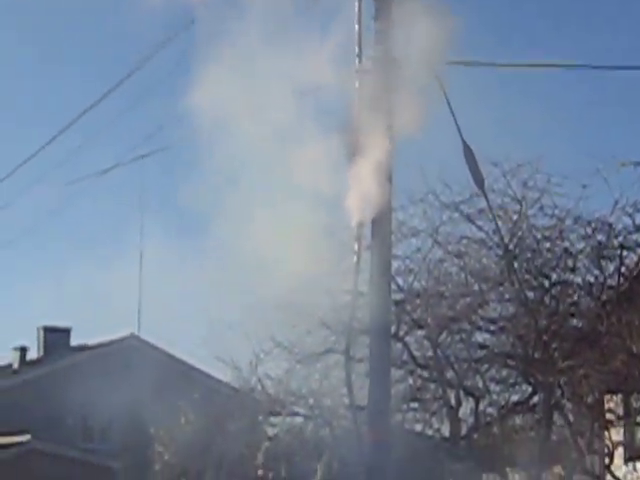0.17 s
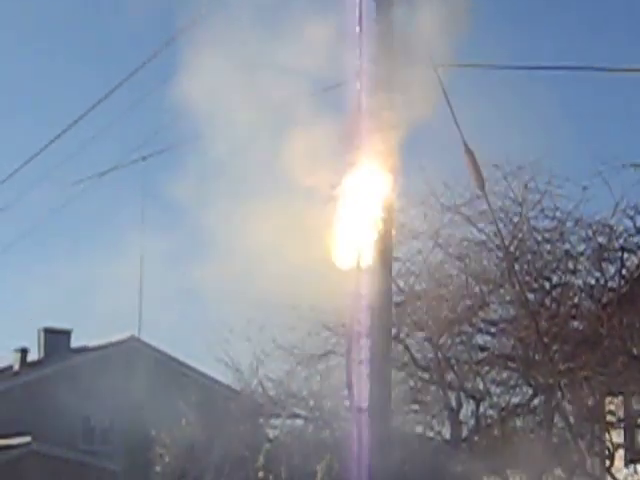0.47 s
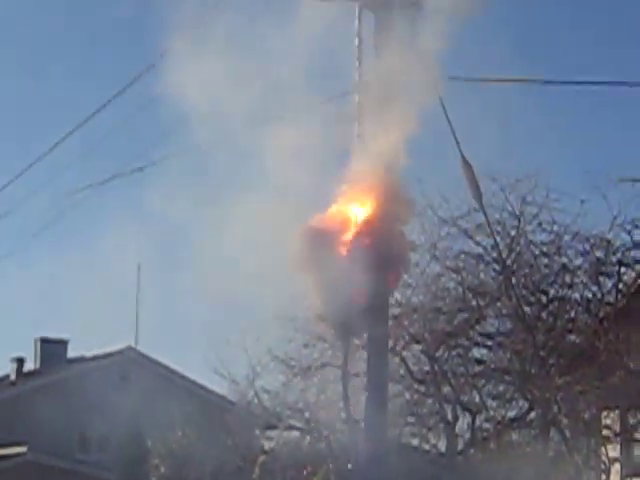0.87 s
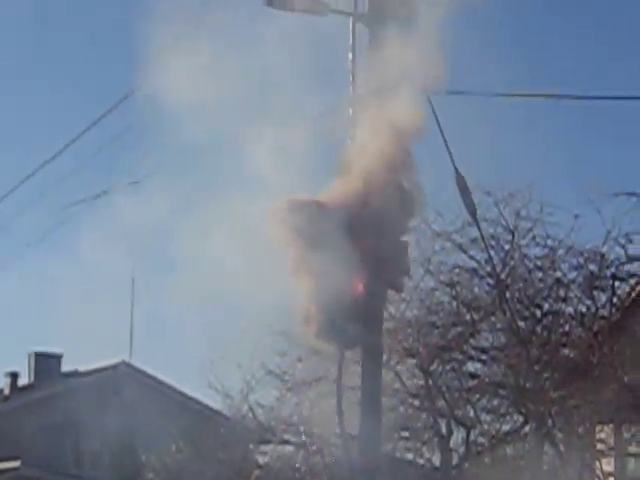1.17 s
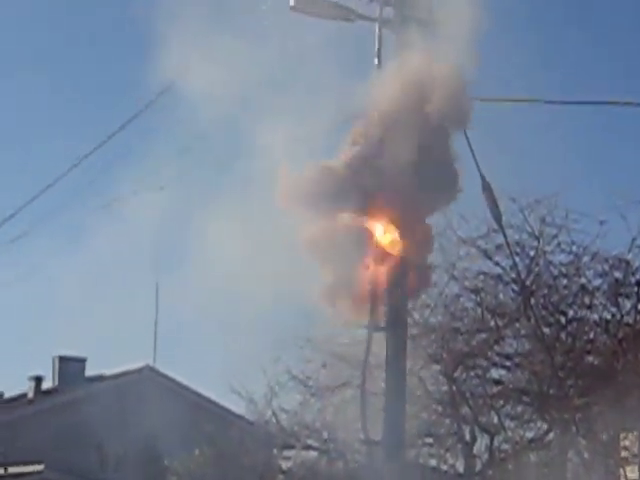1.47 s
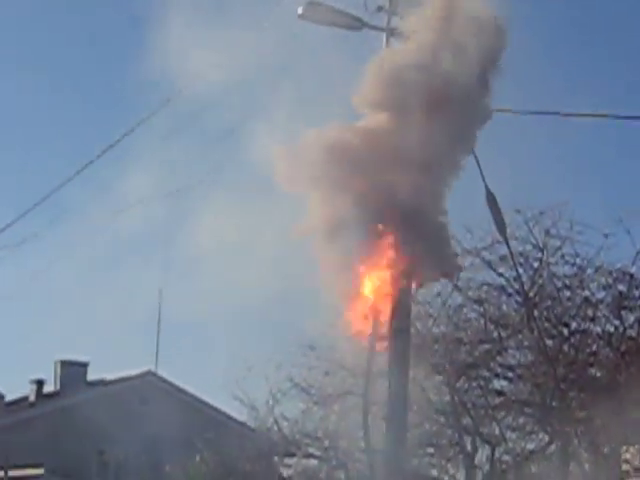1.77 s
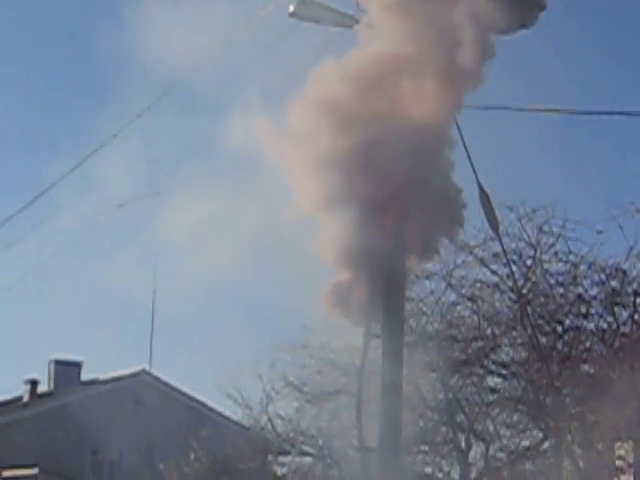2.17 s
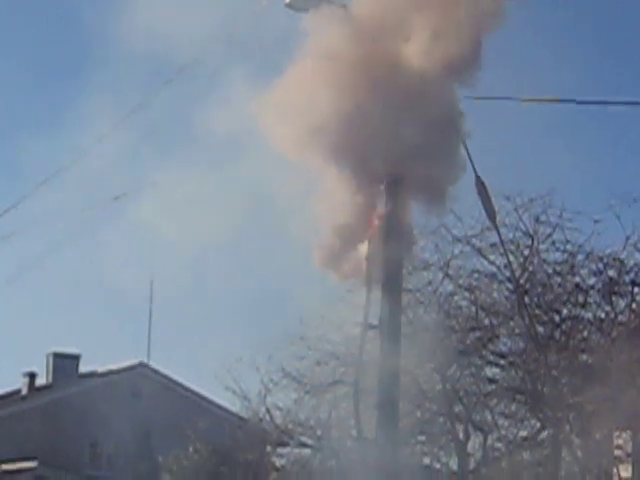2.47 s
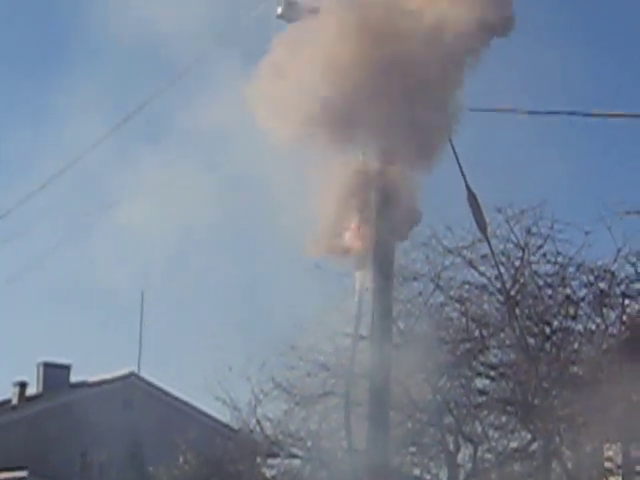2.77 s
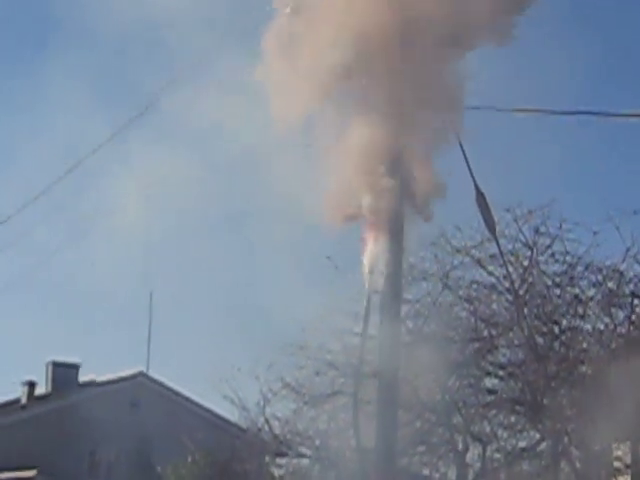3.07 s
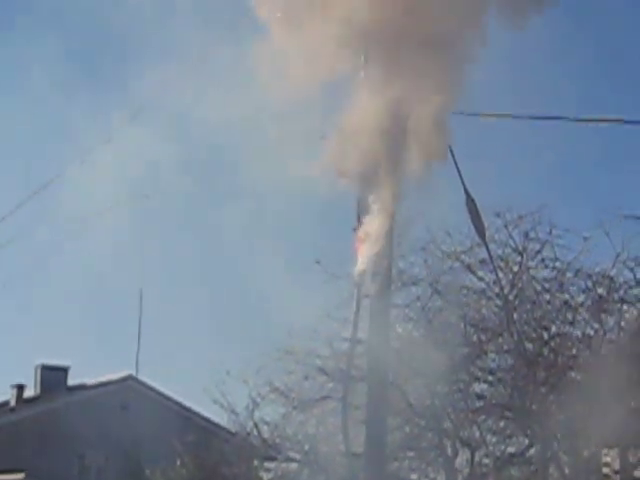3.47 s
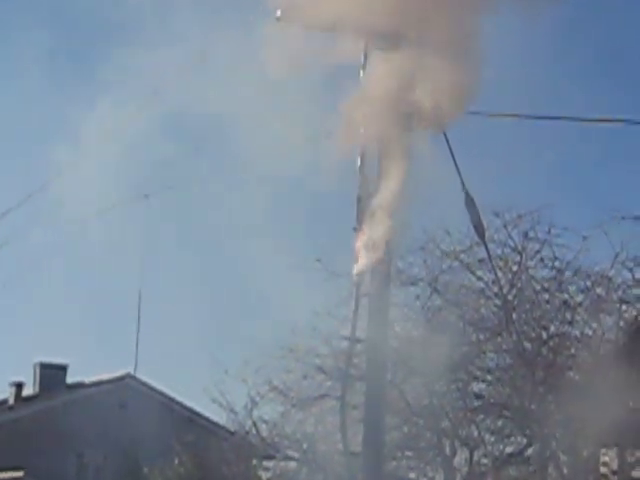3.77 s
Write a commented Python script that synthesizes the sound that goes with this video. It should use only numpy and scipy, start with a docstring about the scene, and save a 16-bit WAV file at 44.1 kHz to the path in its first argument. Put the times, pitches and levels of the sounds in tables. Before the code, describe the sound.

A shorting cable arcs outdoors with two sharp bangs and harsh, stuttering crackle. Burning dies down to light snapping before another bang and a brief hiss. Faint street rush and an idling engine duck under each burst and swell back.

```python
"""Cable shorting on a utility pole

Twice an arc strikes with a bang and burns as a dense, sputtering crackle; the flame it leaves roars on
and dies away among small snaps of hot insulation. A third bang opens a hissing jet of smoke.
Each bang overloads the recorder, whose gain control ducks the street and an idling engine under
the arc and lets them swell back afterwards."""
import sys
import numpy as np
from scipy import signal
from scipy.fft import rfft, irfft, next_fast_len
from scipy.io import wavfile

SR = 44100
rng = np.random.default_rng(int(sys.argv[2]) if len(sys.argv) > 2 else 0)


def master(y):
    """Save y as 16-bit WAV."""
    cut = np.clip(np.atleast_2d(y).T, -1, 1)
    pcm = np.round(cut * 32767)  # scale
    wavfile.write(sys.argv[1], SR, pcm.astype(np.int16))


N = 172872
T = np.arange(N) / SR

# insulation breakdowns: start_s, level_db, swell_s, decay_s, boom_db, share ringing in the cable (0-1)
BANGS = [(0.4053, 19, 0.00023, 0.0078, -2, 0.02), (1.455, 14.5, 0.00041, 0.0075, -2.5, 0.1),
         (3.6404, 10, 0.0019, 0.0032, 2, 0.8)]
# resonances of the hollow, burst cable: pitch_hz, level_db
CABLE_TONE = [(120, -9), (500, -2.5), (750, -8), (1120, 4.5), (1350, -7), (1650, -6.5), (1950, 4),
              (2300, 5), (2780, -4.5), (3130, 5), (3400, 4), (3670, 5.5), (4050, -0.5), (4380, -31),
              (4700, -2.5), (5070, 0.5), (5500, -15), (5900, -11), (6200, -12), (6620, -20), (7200, -15),
              (8350, -28), (9200, -19), (10000, -30), (11400, -31), (13300, -50), (16000, -55)]
SPARKS_PER_S, SPARK_SPREAD_DB = 1400, 3.5
ATTACK_S, RELEASE_S = .0014, .0044  # edges of arc stretches and jet spurts


def from_db(db):
    """Decibels to gain."""
    return 10 ** (np.asarray(db) / 20)


def rms_one(x):
    """Scale to unit rms."""
    return x / np.sqrt(np.mean(x ** 2) + 1e-20)


def noise():
    """White noise."""
    return rng.standard_normal(N)


def fader(curve):
    """Gain riding along rows of time_s, level_db."""
    return from_db(np.interp(T, *np.transpose(curve)))


def lag(x, seconds):
    """One-pole smoothing."""
    pole = np.exp(-1 / (seconds * SR))
    return signal.lfilter([1 - pole], [1, -pole], x + 1e-18)


def cut(x, hz, kind):
    """Gentle low- or band-pass."""
    return signal.sosfilt(signal.butter(2, hz, kind, fs=SR, output="sos"), x)


def band_noise(hz, width_hz):
    """Noise in one resonance, at unit rms."""
    return rms_one(cut(noise(), [max(hz - width_hz / 2, 20), hz + width_hz / 2], "band"))


def colour(x, tone):
    """Causal EQ through rows of pitch_hz, level_db; keeps the power of white noise."""
    size = 2 * next_fast_len(N)
    hz, db = np.transpose(tone)
    grid_hz = np.maximum(np.fft.rfftfreq(size, 1 / SR), 1)
    bass_rolloff = np.minimum(grid_hz / hz[0], 1)
    gain = rms_one(from_db(np.interp(np.log(grid_hz), np.log(hz), db)) * bass_rolloff)
    cepstrum = irfft(np.log(gain))
    cepstrum[1:size // 2] *= 2  # minimum phase: nothing rings ahead of a hit
    cepstrum[size // 2 + 1:] = 0
    return irfft(rfft(x, size) * np.exp(rfft(cepstrum)), size)[:N]


def below(x, hz):
    """The part of a sound below a crossover."""
    return signal.sosfiltfilt(signal.butter(3, hz, fs=SR, output="sos"), x)


def treble(x, db, crossover_hz=7340):
    """High shelf, up or down."""
    body = below(x, crossover_hz)
    return body + (x - body) * from_db(db)


def flicker(x, edges_hz, depth_db=2.3, smooth_s=.008):
    """Each band swells and sinks quickly on its own."""
    bands = np.diff([0 * x] + [below(x, hz) for hz in edges_hz] + [x], axis=0)
    return sum(band * from_db(depth_db * rms_one(lag(lag(noise(), smooth_s), smooth_s)))
               for band in bands)


def echoes(x, db=-9, span_s=.03, count=7):
    """Early reflections from ground, pole and houses."""
    out = x.copy()
    for delay_s in rng.uniform(.002, span_s, count):
        out += from_db(db) / np.sqrt(count) * np.roll(x, int(delay_s * SR)) * (T > delay_s)
    return out / np.sqrt(1 + from_db(db) ** 2)


def gate(start_s, length_s, attack_s=ATTACK_S, release_s=RELEASE_S):
    """Linear attack, hold, exponential release."""
    rise = np.clip((T - start_s) / attack_s, 0, 1)
    return rise * np.exp(-np.maximum(T - start_s - length_s, 0) / release_s)


def pop(decay_s=.0005, size=400):
    """One tiny discharge: a noise burst of unit energy."""
    burst = rng.standard_normal(size) * np.exp(-T[:size] / decay_s)
    return burst / np.linalg.norm(burst)


def pops(rows):
    """A discharge at each row of start_s, level_db."""
    out = np.zeros(N + SR)
    for start_s, db in rows:
        burst, i = from_db(db) * pop(), int(start_s * SR)
        out[i:i + len(burst)] += burst
    return out[:N]


def crackle(per_s, spread_db, shapes=14):
    """Random discharges of uneven size and shape, at unit rms."""
    sizes = from_db(spread_db * np.minimum(rng.exponential(1, N), 4))
    hits = sizes * (rng.random(N) < per_s / SR)
    shape = rng.integers(0, shapes, N)
    return rms_one(sum(signal.oaconvolve(hits * (shape == k), pop())[:N] for k in range(shapes)))


def street():
    """A steady bed of outdoor rush."""
    # spectrum of the rush: pitch_hz, level_db
    rush_tone = [(50, -27), (90, -3), (310, 0.5), (390, -2.5), (530, 2.5), (950, 1), (1170, -2), (1480, 0),
                 (1950, -5.5), (2600, -4), (3600, -14.5), (5000, -15), (8300, -21), (10000, -27.5),
                 (11700, -26.5), (13000, -36), (16000, -41)]
    return from_db(-28) * echoes(colour(noise(), rush_tone))


def engine(firing_hz=23.37, whine_hz=7600, whine_db=-56):
    """An idling engine: low throb, thin whine, and a swish and a squeak each cycle."""
    # partials of the throb: multiple of the firing rate, level_db
    throb = [(1, -62), (2, -47), (3, -47.5), (4, -56.5)]
    # the swish and the squeak: first_peak_s, centre_hz, width_hz, level_db
    squeaks = [(.114, 2400, 1200, -31), (.022, 7050, 400, -46.5)]
    partials = [(k * firing_hz, db) for k, db in throb] + [(whine_hz, whine_db)]
    out = 0
    for hz, db in partials:
        tone = np.sqrt(2) * np.sin(2 * np.pi * (hz * T + rng.random()))
        waver = 1 + .2 * rms_one(lag(noise(), .05))
        out += from_db(db) * tone * waver
    cycle_s = 4 / firing_hz  # four firings to a cycle
    for first_peak_s, hz, width_hz, db in squeaks:
        from_peak_s = (T - first_peak_s + cycle_s / 2) % cycle_s - cycle_s / 2
        out += from_db(db) * np.exp(-(from_peak_s / .016) ** 2) * band_noise(hz, width_hz)
    return out


def bangs(boom_hz=960):
    """The insulation breaks down: a short blast with a low boom, partly ringing through the cable."""
    # spectrum of the open blast: pitch_hz, level_db
    blast_tone = [(50, -2.5), (150, -8.5), (400, -3.5), (800, 4.5), (2300, 6.5), (4000, 12), (8000, -3.5),
                  (12000, -24), (16000, -57)]
    out = 0
    for start_s, db, swell_s, decay_s, boom_db, share in BANGS:
        burst = noise() * gate(start_s, swell_s, swell_s, decay_s)
        blast = colour(burst, blast_tone)
        ring = colour(burst, CABLE_TONE)
        boom = 2 * from_db(boom_db) * cut(blast, boom_hz, "low")
        out += from_db(db) * ((1 - share) * blast + share * ring + boom)
    return out


def arc(dulling_s=.13):
    """Dense sparks over a sizzle, stuttering as the arc catches and breaks; brightest when fresh."""
    # stretches in which the arc burns: start_s, length_s, level_db
    burns = [(0.409, 0.068, 12), (0.438, 0.048, 12.5), (.488, .024, 7), (0.511, .034, 10), (0.54, 0.19, 8),
             (0.7, 0.15, 3.5), (0.858, 0.06, 3.5), (0.929, 0.062, 7), (1.002, 0.024, -8),
             (1.015, 0.045, 5.5), (1.059, 0.01, 14), (1.087, 0.0092, 4.5), (1.112, 0.076, 11.5),
             (1.448, 0.039, 4), (1.485, 0.025, 7.5), (1.521, 0.032, 9.5), (1.561, 0.035, 9),
             (1.592, 0.019, 8), (1.606, 0.014, 13.5), (1.627, 0.038, 9), (1.66, 0.0079, 6),
             (1.671, 0.025, 10), (1.698, 0.11, 8)]
    # the hardest cracks within the arc: start_s, relative_db
    hard_cracks = [(0.5496, -5), (0.6105, -7), (0.6204, -3), (0.7407, -7), (0.7592, -8), (0.8084, -4),
                   (0.828, -4), (0.8694, -5), (0.9293, -3), (0.9784, -6), (1.0261, -4), (1.054, -3),
                   (1.1448, -4), (1.1584, -4), (1.5104, -6), (1.6112, -4), (1.6676, -5), (1.7664, -5),
                   (1.8104, -7)]
    # spectrum of the discharge: pitch_hz, level_db
    arc_tone = [(60, -51), (140, -45), (220, -17.5), (400, -16), (560, -14.5), (720, -6.5), (900, -20.5),
                (1100, -10.5), (1380, -16), (1580, -3.5), (1850, -12.5), (2230, 4), (2600, 2.5),
                (3300, 3.5), (4150, -7.5), (5000, -2), (5500, -0.5), (5980, -2), (6500, -11), (7400, -13),
                (8500, -6), (9400, -13.5), (11500, -17), (13000, -33), (16000, -48)]
    current = np.max([from_db(db) * gate(start_s, length_s) for start_s, length_s, db in burns], axis=0)
    sparks = crackle(SPARKS_PER_S, SPARK_SPREAD_DB)
    sizzle = from_db(-9) * noise()
    cracks = from_db(28) * cut(pops(hard_cracks), [900, 9000], "band")
    discharge = colour(current * (sparks + sizzle + cracks), arc_tone)
    discharge = flicker(discharge, edges_hz=(4300, 7000, 10000))
    freshness = sum(gate(start_s, 0, release_s=dulling_s) for start_s, *_ in BANGS)
    return echoes(treble(discharge, db=12.5 * freshness - 1.5), db=-10.5, span_s=.009)


def flame():
    """Burning gas: a smooth roar, lit by the first bang, that outlasts the arc."""
    # swell and fade of the roar: time_s, level_db
    roar_curve = [(.41, -30), (.6, 1), (1.2, -8.5), (1.4, -5.5), (1.6, -7), (1.83, -18.5), (1.98, -11),
                  (2.1, -15), (2.2, -22.5), (2.3, -28.5), (2.55, -34.5), (2.8, -41), (3.6, -53)]
    # spectrum of the roar: pitch_hz, level_db
    roar_tone = [(100, -24), (300, -13.5), (550, -5.5), (850, -2), (1250, -2.5), (1800, -2), (2300, 3.5),
                 (3400, 1.5), (5200, -3.5), (6700, -14), (8500, -13.5), (11000, -30), (15000, -62)]
    lit = T > BANGS[0][0]
    return fader(roar_curve) * echoes(colour(noise(), roar_tone)) * lit


def insulation():
    """Hot insulation fries, with single louder snaps."""
    # swell and fade of the frying: time_s, level_db
    frying_curve = [(0, -45), (1.9, -51), (2.2, -36.5), (2.4, -31.5), (2.53, -33.5), (2.62, -43),
                    (2.85, -41.5), (3.0, -43), (3.6, -45.5)]
    # single snaps: start_s, relative_db
    snaps = [(2.202, -15), (2.2152, -10.5), (2.2899, -25), (2.3046, -13.5), (2.3406, -11), (2.3455, -9),
             (2.363, -19), (2.388, -14), (2.396, -8.5), (2.4193, -5), (2.4563, -16), (2.4902, -19),
             (2.518, -24), (2.5249, -8), (2.5415, -20), (2.5523, -9), (2.6294, -13.5), (2.7371, -16),
             (2.803, -15), (2.819, -24), (2.856, -18.5), (2.9679, -17), (3.0876, -18.5), (3.103, -16.5),
             (3.1485, -19.5), (3.5301, -19)]
    # spectrum of frying and snaps: pitch_hz, level_db
    snap_tone = [(300, -32), (2500, -0.5), (4000, 3.5), (5000, 6), (6600, -5.5), (8500, -2.5), (10500, -4),
                 (13000, -33.5), (16000, -28)]
    frying = fader(frying_curve) * crackle(per_s=1200, spread_db=4.5)
    return colour(frying + from_db(13) * pops(snaps), snap_tone)


def jet(rise_s=.014, fade_db_per_s=52.5, dulling_db_per_s=86):
    """After the last bang, gas hisses and spits through the burst cable, fading and dulling."""
    # spurts, each ringing one resonance of the hollow: start_s, centre_hz, level_db, length_s
    spurts = [(3.718, 2100, -7.5, 0.0046), (3.744, 1090, -11, .008), (3.8255, 2230, -9.5, .007),
              (3.827, 3880, -11.5, .007), (3.854, 2250, -11, 0.0037), (3.872, 7140, -23.5, 0.0047)]
    # crossovers between the flickering bands of the hiss: pitch_hz
    edges_hz = (1470, 2740, 4640, 6700)
    age_s = np.maximum(T - BANGS[-1][0], 0)
    flow = np.minimum(age_s / rise_s, 1) * from_db(-8.5 - fade_db_per_s * age_s)
    grainy_rush = echoes(noise() + from_db(-4.5) * crackle(SPARKS_PER_S, SPARK_SPREAD_DB))
    hiss = treble(colour(flow * grainy_rush, CABLE_TONE), db=27.5 - dulling_db_per_s * age_s)
    spitting = sum(from_db(db) * gate(start_s, length_s) * band_noise(hz, width_hz=350)
                   for start_s, hz, db, length_s in spurts)
    return flicker(hiss, edges_hz) + spitting


def scene():
    """The shorting cable over the engine and the street, in mono."""
    return (bangs() + arc() + flame() + insulation() + jet() + engine() + street())[None]


def record(dry):
    """Gain control clamps fast and recovers slowly; peaks that slip through clip; the top is cut."""
    threshold_db, sense_s, attack_s, recovery_db_per_s = -19.5, .011, .0044, 92.5
    ceiling, hardness, cutoff_hz = .64, 5, 15700
    level_db = 10 * np.log10(lag(dry[0] ** 2, sense_s) + 1e-12)
    excess_db = np.maximum(level_db - threshold_db, 0)
    recovery_db = recovery_db_per_s * T
    duck_db = np.maximum.accumulate(excess_db + recovery_db) - recovery_db
    ducked = dry * from_db(-lag(duck_db, attack_s))
    clipped = ducked / (1 + np.abs(ducked / ceiling) ** hardness) ** (1 / hardness)
    return signal.sosfilt(signal.ellip(10, .2, 80, cutoff_hz, fs=SR, output="sos"), clipped)


dry = scene()
out = record(dry)
master(out)
```